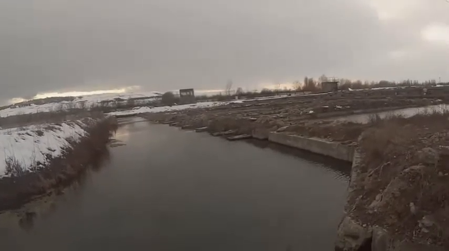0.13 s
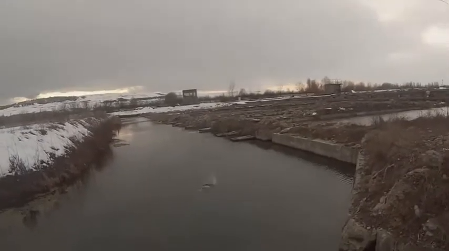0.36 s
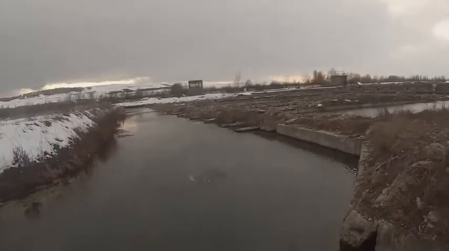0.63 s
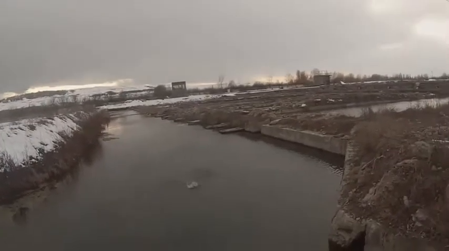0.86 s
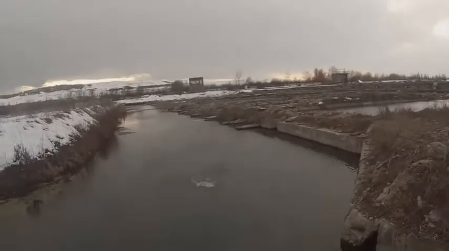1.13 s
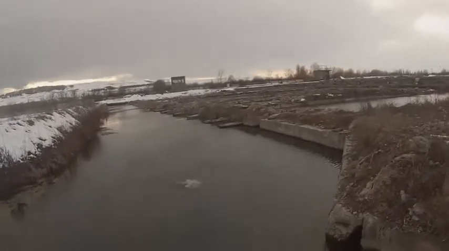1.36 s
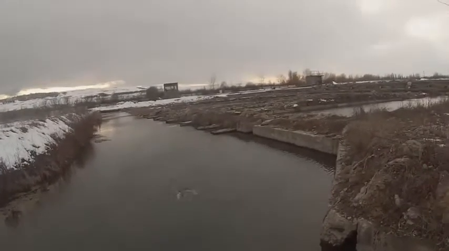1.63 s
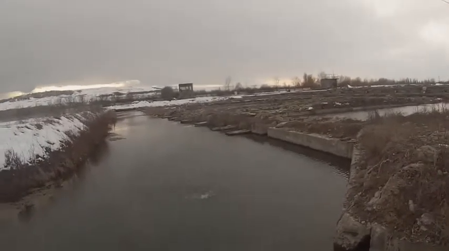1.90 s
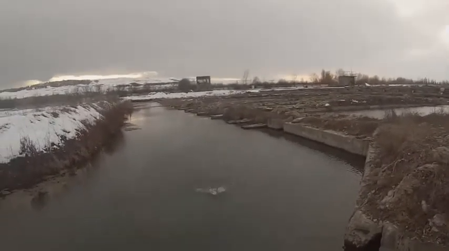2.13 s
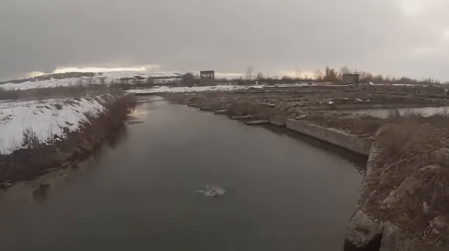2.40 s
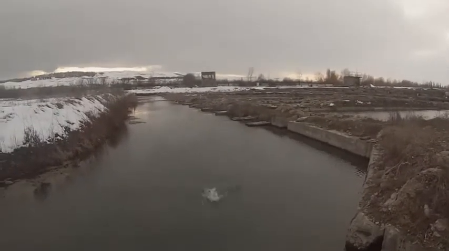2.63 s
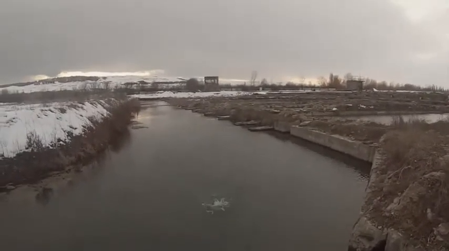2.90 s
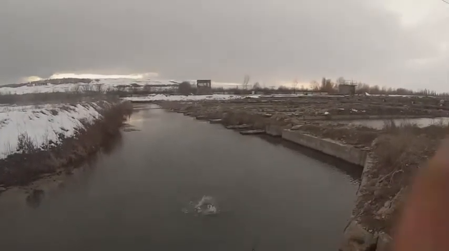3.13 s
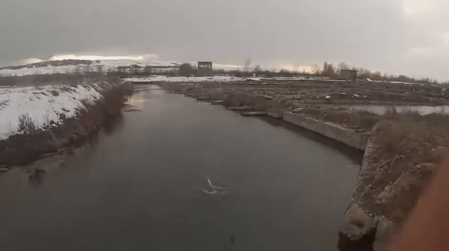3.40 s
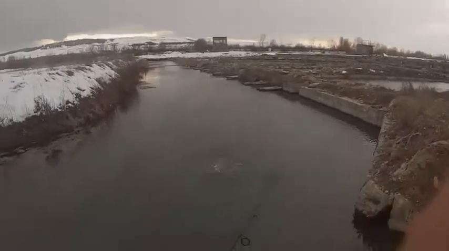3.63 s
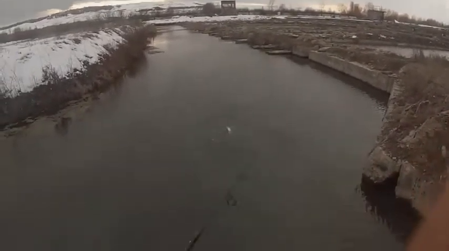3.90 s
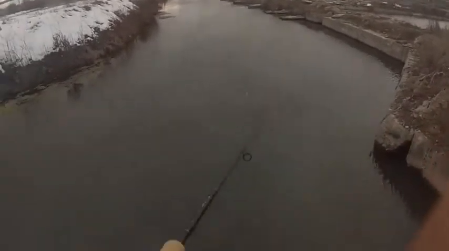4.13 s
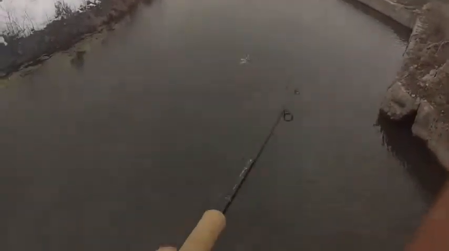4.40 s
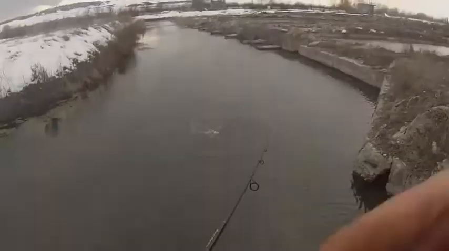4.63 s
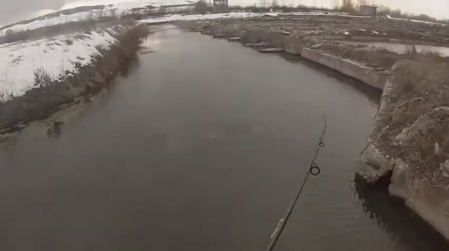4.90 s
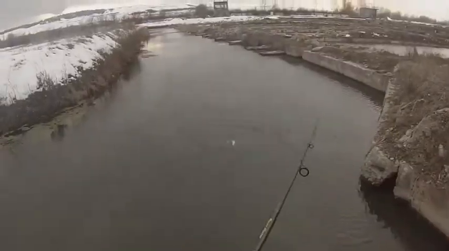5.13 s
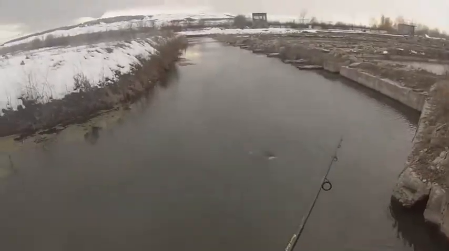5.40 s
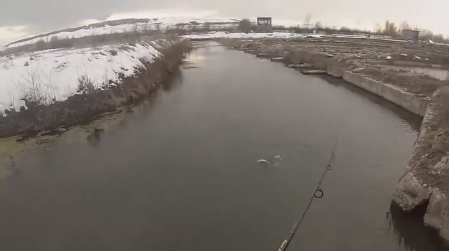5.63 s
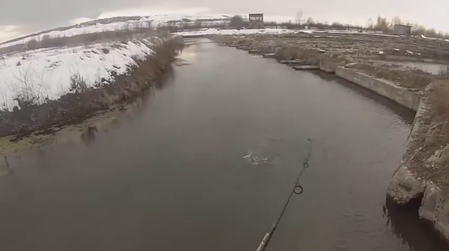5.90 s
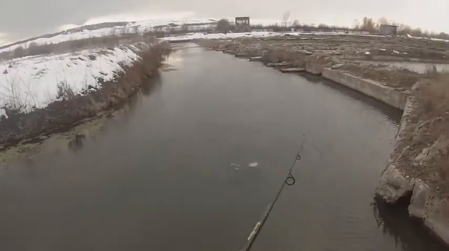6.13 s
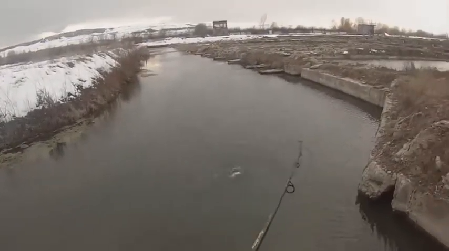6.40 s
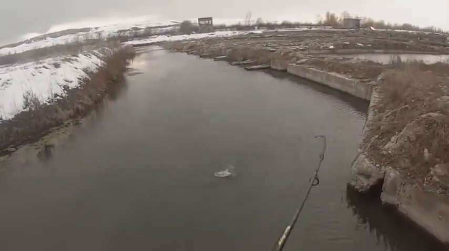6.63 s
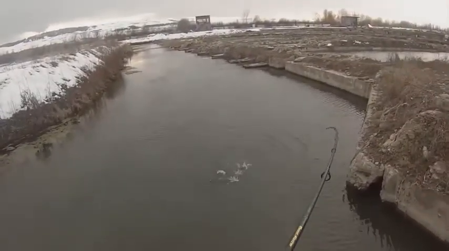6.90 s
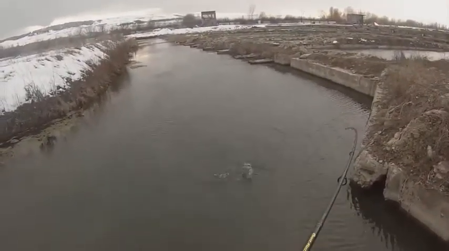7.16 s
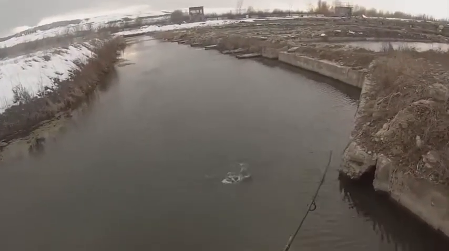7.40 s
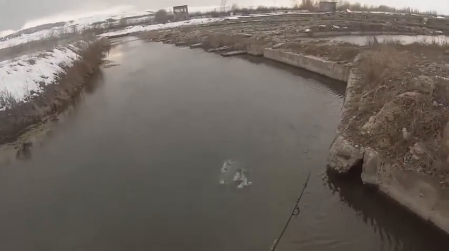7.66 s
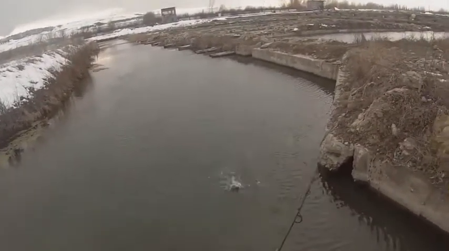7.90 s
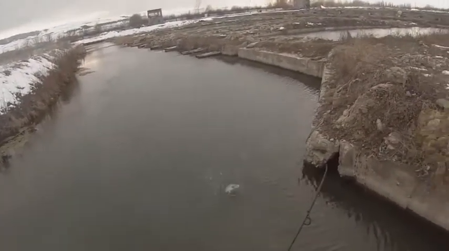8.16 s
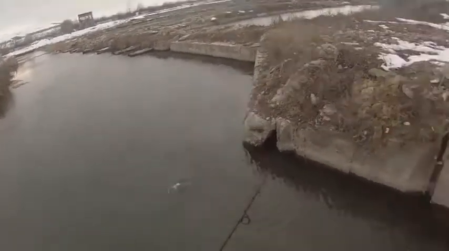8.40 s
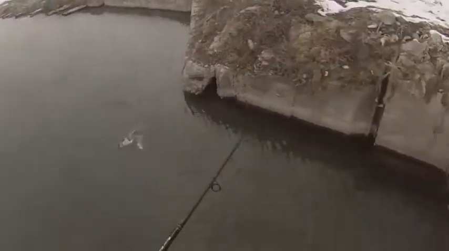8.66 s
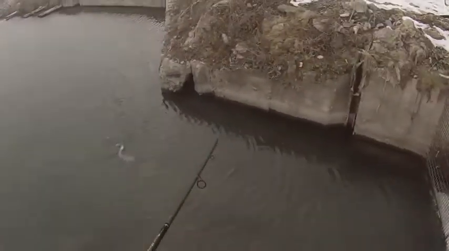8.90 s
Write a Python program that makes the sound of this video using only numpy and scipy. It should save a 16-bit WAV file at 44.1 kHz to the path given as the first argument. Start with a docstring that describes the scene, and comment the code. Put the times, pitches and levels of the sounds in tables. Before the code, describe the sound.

Boxy, muffled, close single-channel sound. Deep wind flutter and crackly mid-range hiss lie under rapid tiny high-pitched reel clicks, which thin out within two seconds. Sudden handling follows: sharp plastic cracks, low pressure thuds, brief creaks and scratchy strokes, some loud enough to distort, while the hiss dips. The rest is calm open air with sparse faint taps, a single clear reel tick, and clothing brushing near the end.

```python
"""An angler plays a fish on a canal bank; the camera sits in a closed plastic case worn on the head.
First wind noise rumbles on the case, outdoor hiss comes through its resonances and a ringing pawl ticks in the reel.
After three seconds a hand presses, rubs and snaps at the case: pulses of air, gritty noise and short clicks.
Then wind and hiss go on, with clothing rustling as filtered noise, two lone reel ticks and a few light taps."""
import sys
import numpy as np
from scipy import signal
from scipy.fft import rfft, irfft
from scipy.io import wavfile
from scipy.ndimage import uniform_filter1d

SR = 44100
rng = np.random.default_rng(int(sys.argv[2]) if len(sys.argv) > 2 else 0)


def transcribe(signal):
    """Save signal, clipped to [-1, 1], as a 16-bit WAV file at the path in sys.argv[1]."""
    frames = np.atleast_2d(signal).T
    limited = np.clip(frames, -1, 1)
    pcm = np.round(limited * 32767).astype(np.int16)
    wavfile.write(sys.argv[1], SR, pcm)


def rack_gain(trim_db):
    """Turn a fader trim in dB into the linear factor to multiply a signal by."""
    fader = np.asarray(trim_db, float)
    return 10 ** (fader / 20)


N = 398223  # length in samples, about 9 s


def read(points, hz):
    """Reads a spectrum's dB at the frequencies hz, with straight lines over log frequency."""
    f, db = np.transpose(points)
    return np.interp(np.log(hz + 1), np.log(f + 1), db)


def level_curve(s, db):
    """Draws a level in dB through the given moments, one value per sample."""
    return np.interp(np.arange(N) / SR, s, db)


def evened(x):
    """Scales to rms 1."""
    return x / np.sqrt(np.mean(x ** 2) + 1e-20)


def lumps(width_s):
    """Slow random wavering of rms 1: noise smoothed twice."""
    size = int(width_s * SR)
    once = uniform_filter1d(rng.standard_normal(N), size)
    return evened(uniform_filter1d(once, size))


def add(mix, s, sound):
    """Mixes a sound in at s seconds."""
    part = mix[round(s * SR):][:len(sound)]
    part += sound[:len(part)]


def colour(x, db_of):
    """Filters with the shape db_of(hz), never sounding ahead of its input; the filter has unit energy."""
    log_gain = np.log(rack_gain(db_of(abs(np.fft.fftfreq(8192, 1 / SR)))))
    minimum_phase = -signal.hilbert(log_gain).imag
    taps = np.fft.ifft(np.exp(log_gain + 1j * minimum_phase)).real[:4096]
    return signal.oaconvolve(x, taps / np.linalg.norm(taps))[:len(x)]


def lift(hz, modes, ring=1):
    """Resonances as dB of lift: each mode is a bump around its own frequency."""
    return ring * sum(db / (1 + (2 * (hz - f) / width) ** 2) for f, width, db in modes)


def shaped_noise(spectrum):
    """Steady noise of rms 1 with the given spectrum."""
    gain = rack_gain(read(spectrum, np.fft.rfftfreq(N, 1 / SR)))
    return evened(irfft(rfft(rng.standard_normal(N)) * gain, N))


# Wind on the case, stronger while the held case sways.
# Each row: time in seconds, level of the rumble in dB, level of the flutter in dB.
WIND_LEVELS = [(0.0, -41, -57.5), (0.52, -42.5, -54.5), (0.8, -49.5, -57.5), (1.0, -35, -54.5),
               (1.4, -40.5, -61.5), (1.9, -48.5, -57), (2.45, -40, -58), (2.65, -43, -51.5),
               (3.18, -49, -54.5), (3.4, -29, -47.5), (3.9, -30, -42), (4.0, -35, -51.5), (4.5, -43, -56),
               (4.75, -37.5, -51.5), (4.95, -38, -55.5), (5.15, -46, -49), (5.6, -49, -55),
               (6.1, -44.5, -46), (6.5, -47, -54.5), (7.05, -52.5, -62), (7.9, -47.5, -58),
               (8.45, -57, -52), (8.8, -49, -57.5), (9.03, -53.5, -55.5)]
# Tone of the rumble, of the slow eddies and of the fast eddies. Each row: frequency in Hz, level in dB.
RUMBLE_TONE = [(8, -9), (22, 7.5), (40, -9.5), (65, -11), (110, -28.5), (200, -86.5)]
SLOW_EDDIES = [(30, -21), (60, -5.5), (100, -1.5), (150, -7.5), (300, -22), (600, -25), (1200, -55.5)]
FAST_EDDIES = [(60, -14.5), (120, 6), (180, -8), (240, -5), (330, -19), (800, -67)]


def wind():
    """Air turbulence on the case: a deep rumble and a lumpier flutter of slow and fast eddies."""
    s, rumble_db, flutter_db = np.transpose(WIND_LEVELS)
    fast_share = 0.42  # of the flutter's power
    slow = np.sqrt(1 - fast_share) * shaped_noise(SLOW_EDDIES)
    fast = np.sqrt(fast_share) * shaped_noise(FAST_EDDIES)
    flutter = evened(rack_gain(2.04 * lumps(0.013))) * (slow + fast)
    rumble = shaped_noise(RUMBLE_TONE)
    return rack_gain(level_curve(s, rumble_db)) * rumble + rack_gain(level_curve(s, flutter_db)) * flutter


# The outdoor hiss sinks while the case is handled. Each row: time in seconds, level in dB.
AIR_LEVELS = [(0.0, -54), (1.3, -53), (1.8, -55), (3.2, -53), (3.9, -63), (4.2, -62.5), (4.5, -60),
              (4.7, -54.5), (5.54, -55.5), (7.5, -54), (9.03, -50.5)]
# Tone of the hiss ahead of the cavity. Each row: frequency in Hz, level in dB.
AIR_TONE = [(88, -26.5), (150, -3), (796, -9.5), (1800, -8), (2230, -8.5), (2650, -2.5), (4060, -18),
            (5650, -21), (14600, -33), (15500, -43)]
# Resonances of the case cavity, which also ring under a touch.
# Each row: frequency in Hz, width in Hz, lift in dB.
CAVITY = [(1788, 390, 9.5), (2620, 140, 3.5), (3356, 170, 2.5), (3660, 360, 2.5), (4780, 220, 3.5),
          (5680, 340, 7)]


def air():
    """Outdoor hiss with a fine crackle of random grains, coloured by the cavity."""
    grain_size = rack_gain(1.8 * np.minimum(rng.exponential(1, N), 2))
    grain_here = rng.random(N) < 150 / SR  # about 150 grains per second
    crackle = uniform_filter1d(grain_size * grain_here * rng.standard_normal(N), 5)
    wavering = rng.standard_normal(N) * rack_gain(lumps(0.027))
    drive = wavering + 0.2 * evened(crackle)
    hiss = colour(drive, lambda hz: read(AIR_TONE, hz) + lift(hz, CAVITY))
    return rack_gain(level_curve(*np.transpose(AIR_LEVELS))) * evened(hiss)


# Runs of the reel's pawl, a lone tick when the length is 0.
# Each row: start in seconds, length in seconds, level in dB, ticks per second before jitter.
PAWL_RUNS = [(0.089, .045, -56, 56), (0.207, 0.082, -54.5, 68), (0.355, 0.17, -57, 41), (.6828, 0, -54, 60),
             (.7522, 0.06, -54, 60), (0.775, .11, -64, 116), (.8979, 0.058, -52, 80),
             (1.004, .045, -52, 64), (1.096, .055, -58, 75), (1.246, .055, -61, 45),
             (1.399, 0.098, -60, 50), (1.7479, 0.35, -61, 13.7), (6.3799, 0, -44, 60),
             (7.0643, 0, -56.5, 60)]
# The pawl's main ring: frequency in Hz, time to fall by 60 dB in seconds.
PAWL_RING = (8470, 0.027)
# The reel body answers each tick faintly, at the same level in every run. # Each row: frequency in Hz, level in
# dB, time to fall by 60 dB in seconds; every mode's level and pitch vary by tick.
REEL_BODY = [(5640, -60.5, 0.0087), (6500, -69.5, .01), (7400, -65.5, 0.011), (9600, -68, 0.012),
             (10900, -69, .008), (12200, -74, .008)]


def reel():
    """Each tick rings the pawl and the reel body; pitch and body levels vary from tick to tick."""
    spread_db, jitter = 4.5, 0.3  # ticks in a run differ in strength and spacing
    out, t = np.zeros(N), np.arange(2000) / SR
    ring_hz, ring_t60 = PAWL_RING
    onset = 1 - np.exp(-t / 0.00014)
    for start, length, run_db, rate in PAWL_RUNS:
        chance = rng.uniform(-2, 1.76, (16, len(REEL_BODY) + 3))  # one row per possible tick
        times = start + np.r_[0, np.cumsum(1 + jitter * chance[1:, 0])] / rate
        for s, (_, size, detune, *luck) in zip(times[times <= start + length], chance):
            db = run_db + spread_db * size * (length > 0)
            tick = rack_gain(db - 60 * t / ring_t60) * np.sin(2 * np.pi * ring_hz * (1 + 0.0087 * detune) * t)
            for (hz, body_db, t60), c in zip(REEL_BODY, luck):
                fading = rack_gain(body_db + 6.5 * c - 60 * t / t60)
                tick += fading * np.sin(2 * np.pi * hz * (1 + 0.024 * c) * t)
            add(out, s, tick * onset)
    return out


# Tone of a touch on the plastic wall. Each row: frequency in Hz, level in dB.
TOUCH_TONE = [(90, -58.5), (300, -17.5), (700, -20.5), (1300, -11.5), (2500, -7.5), (3900, -9.5),
              (4300, -16), (8000, -27.5), (15000, -43.5), (17000, -51)]
# Resonances of the wall itself. Each row: frequency in Hz, width in Hz, lift in dB.
WALL_MODES = [(793, 12, 6.5), (4170, 260, -10.5), (6640, 201, -5), (7550, 300, 2), (8600, 850, 9),
              (9620, 300, 6.5), (12600, 700, 11)]


def touched(x, bright_db, ring, body_db=0):
    """Contact sound through wall and cavity; hard contact is bright, blunt contact adds body under 1.3 kHz."""
    def db_of(hz):
        resonances = lift(hz, CAVITY + WALL_MODES, ring)
        tilt = bright_db * np.log2((hz + 1500) / 4000)
        body = body_db / (1 + (hz / 1300) ** 4)
        return read(TOUCH_TONE, hz) + resonances + tilt + body
    return colour(x, db_of)


def rub(length, db, bright_db, rise, body_db=0):
    """Gritty friction noise that swells, stutters and fades; its treble needs the strongest part of the stroke."""
    u = np.arange(int(length * SR)) / (length * SR)
    stroke = np.minimum(u / rise, (1 - u) / (1 - rise))
    noise, wavering = rng.standard_normal((2, SR // 2))
    stutter = rack_gain(2.1 * evened(uniform_filter1d(wavering, 90)))
    grit = evened(noise * stutter)[:len(u)]
    dull = uniform_filter1d(grit, 4)
    drive = dull * stroke ** 0.5 + (grit - dull) * stroke ** 0.83
    room_to_ring = np.zeros(1500)
    return rack_gain(db) * touched(np.r_[drive, room_to_ring], bright_db, 0.38, body_db)


def tap(db, bright_db, body_db, ring):
    """A hard first contact and a short rattle whose treble dies first, heard through the wall."""
    fade_db = -60 * np.arange(2000) / SR / 0.017  # 60 dB in 0.017 s
    rattle = 0.13 * rng.standard_normal(2000) * rack_gain(fade_db)
    dull = uniform_filter1d(rattle, 5)
    drive = dull + (rattle - dull) * rack_gain(0.39 * fade_db)
    drive[0] = 1  # the first contact
    click = touched(drive, bright_db, ring, body_db)
    return rack_gain(db) * click / abs(click).max()


def strays():
    """Faint taps of strap and clothing at chance moments."""
    out, per_s = np.zeros(N), 1.4
    for when, size, tone in rng.random((round(N / SR * per_s), 3)):
        add(out, when * N / SR, tap(-51 - 6 * size, 12 * (tone - 0.6), 0, 0.71))
    return out


# Clothing rustles as the head turns. Each row: start in seconds, length in seconds, level in dB,
# brightness in dB per octave (of frequency plus 1500 Hz), share of the length spent rising.
RUSTLE_ROWS = [(5.152, .2, -49, -5.5, 0.54), (8.345, 0.38, -46.5, -5.5, 0.16),
               (8.603, 0.48, -59.5, 2, 0.16)]


def rustles():
    """Cloth friction, made like a rub but thinner in the body."""
    out = np.zeros(N)
    for s, *stroke in RUSTLE_ROWS:
        add(out, s, rub(*stroke, body_db=-12.5))
    return out


# The mount creaks faintly under strain. Each row: start in seconds, length in seconds, level in dB.
CREAK_ROWS = [(3.365, .07, -52), (3.476, 0.027, -50.5), (3.538, .08, -57), (4.415, .065, -66)]


def creaks():
    """Stick and slip: uneven small slips ring one low mode."""
    mode_hz, width_hz, slips_per_s = 790, 75, 44
    out, t = np.zeros(N), np.arange(2000) / SR
    mode = np.exp(-np.pi * width_hz * t) * np.sin(2 * np.pi * mode_hz * t)
    for s, length, db in CREAK_ROWS:
        chance = rng.random(int(length * SR))
        slips = (chance < slips_per_s / SR) + 0.026 * (chance - 0.5)  # slips over a faint scrape
        strain = np.hanning(len(slips)) ** 0.27
        add(out, s, rack_gain(db) * evened(signal.oaconvolve(slips * strain, mode)))
    return out


# The mount wobbles around a knock. Each row: moment of the widest swing in seconds, level in dB,
# frequency in Hz, build-up in ms, dying away in ms.
WOBBLE_ROWS = [(3.2654, -8.5, 107, 11, 1.7), (3.5244, -12, 124, 2.1, 4.5), (3.9411, -20, 88, 0.84, 8.3)]


def wobbles():
    """The mount swings at a low pitch, building up and dying away at different speeds."""
    out, t = np.zeros(N), np.arange(-3000, 15000) / SR
    for s, db, hz, rise_ms, fall_ms in WOBBLE_ROWS:
        swing = np.exp(-(1000 * t / np.where(t < 0, rise_ms, fall_ms)) ** 2)
        add(out, s + t[0], rack_gain(db) * swing * np.cos(2 * np.pi * hz * t))
    return out


# Presses that squeeze the air in the case. Each row: moment of the peak in seconds,
# level in dB before the air leaks, time scale in ms, direction (+1 push, -1 pull).
PRESS_ROWS = [(3.4205, 0, 2.68, -1), (3.4446, -13, 3.3, -1), (3.518, -8, 3, -1), (3.6045, -11.5, 7.4, -1),
              (3.666, -15, 32, -1), (3.728, -13, 44, -1), (3.804, -10.5, 33, -1), (3.9211, -18.5, 1.86, 1),
              (3.928, -17, 5.8, -1), (4.0818, -22, 5, 1), (4.122, -22, 26, -1), (4.212, -18, 44, -1),
              (4.449, -18, 59, -1), (4.542, -17, 7.1, 1), (4.563, -12, 14, -1), (4.614, -19.5, 1.7, 1),
              (4.646, -14.5, 8.6, 1), (4.674, -5.5, 47, -1), (8.4, -33.5, 1.4, -1), (8.425, -29, 2.3, -1)]


def presses():
    """Squeezed air pulses: quick onset, slower release, then a rebound as the air leaks out again."""
    squeeze, t = np.zeros(N), np.arange(-3000, 15000) / SR
    for s, db, ms, way in PRESS_ROWS:
        u = np.maximum(1 + 1.7 * 1000 * t / ms, 0)  # 0 at the onset, 1 at the peak
        add(squeeze, s + t[0], np.sign(way) * rack_gain(db) * (u * np.exp(1 - u)) ** 2)
    leak_hz = 14
    return signal.lfilter(*signal.butter(1, leak_hz, "high", fs=SR), squeeze)


# Rubs of glove and cloth. Each row: start in seconds, length in seconds, level in dB,
# brightness in dB per octave (of frequency plus 1500 Hz), share of the length spent rising.
RUB_ROWS = [(3.248, .036, -21.5, -1.5, 0.064), (3.277, .11, -39, -0.5, 0.065),
            (3.339, 0.067, -33, 1.5, 0.13), (3.387, 0.075, -40, 3.5, .19), (3.464, 0.079, -48.5, -5, 0.17),
            (3.516, 0.098, -47.5, -1.1, 0.061), (3.596, 0.11, -50, -4.5, 0.54), (3.663, 0.17, -49, -3, .41),
            (3.777, .18, -45, -4.5, 0.16), (3.939, 0.056, -51, -12, 0.092),
            (4.064, .12, -51.5, -12.5, 0.48), (4.199, 0.063, -46.5, -9, 0.46),
            (4.305, 0.066, -45.5, -9, 0.43), (4.572, 0.11, -50.5, -10, .47), (4.616, 0.039, -26.5, 3, .65)]


def rubs():
    """Friction strokes along the case wall."""
    out = np.zeros(N)
    for s, *stroke in RUB_ROWS:
        add(out, s, rub(*stroke))
    return out


# Snaps and taps on the case. Each row: start in seconds, peak in dB,
# brightness in dB per octave (of frequency plus 1500 Hz), body in dB, factor on the resonances' lift.
TAP_ROWS = [(1.2428, -33, -7, -18, 1.6), (1.3894, -29.5, -10, -13, 2.35), (2.6591, -38.5, -10, -11, 3.4),
            (3.2487, -11, -4.5, 2, 1.46), (3.2606, -22, 8, 10, .8), (3.346, -27.5, -3, 21, 2.2),
            (3.4193, -17.5, -4, 36, 1.85), (3.4815, -31, 3, 12, 0.65), (3.5241, -11, -16, -2.5, 0.66),
            (3.5701, -42, 21, 6, 1.3), (3.6014, -25, -9, 17, 1.2), (3.6151, -31.5, -6, -11, 0.46),
            (3.7341, -17.5, -21, -19.5, .4), (3.77, -27, -18, 3, 0.53), (3.925, -22, 3.5, -2.5, .8),
            (3.9399, 1.5, 8.5, 3.5, 0.6), (3.9441, -13.5, 7, 15, 0.71), (3.998, -38, -4, -2.5, 1.7),
            (4.0165, -37, 4, 17, 1.3), (4.0803, -24, -0.5, 19, 0.86), (4.1212, -32, 2.5, 18, .8),
            (4.1771, -39.5, -10, 3.5, 0.99), (4.2001, -46, -9, 6.5, 1.3), (4.2235, -41, 6.5, 11, 1.3),
            (4.3532, -33.5, 0.5, 23, 1.7), (4.5727, -39, -14.5, 10, .7), (4.6106, -4.5, -0.5, -8.5, 1.14),
            (4.681, -41.5, 0, -4, 1.2), (5.9196, -39, -19, -6, 2.4), (6.7887, -35.5, -9, -23, 1.4),
            (7.6128, -35, -6, -7.8, 0.71), (7.7684, -34.5, 2, 13, 1.2), (8.7806, -37, -6, 4, 2.2)]


def taps():
    """Hard contacts that set wall and cavity ringing."""
    out = np.zeros(N)
    for s, *contact in TAP_ROWS:
        add(out, s, tap(*contact))
    return out


def hand():
    """Everything the hand does to the case: it strains the mount, squeezes the air, rubs and snaps."""
    return creaks() + wobbles() + presses() + rubs() + taps()


def scene():
    """All sources, one channel."""
    return (wind() + air() + reel() + strays() + rustles() + hand())[None]


def top_cut(x):
    """Nothing passes above the cut-off."""
    return signal.sosfilt(signal.butter(12, 16650, fs=SR, output="sos"), x)


def record(dry):
    """The converter clips loud peaks, then a steep filter ends the band at 16 kHz."""
    limited = np.clip(dry, -0.9, 0.9)
    edge = signal.firwin(201, 16000, window=("kaiser", 8), fs=SR)[None]
    mix = signal.oaconvolve(limited, edge, "same")
    return top_cut(mix)


dry = scene()
out = record(dry)
transcribe(out)
```